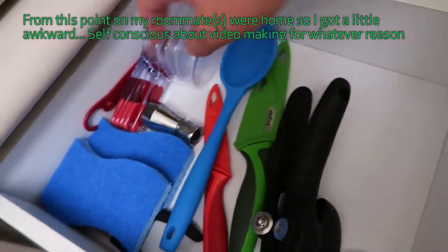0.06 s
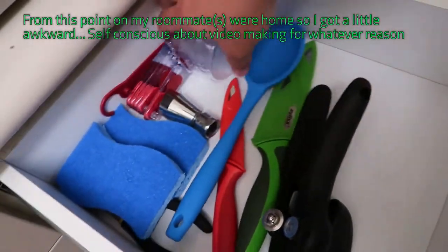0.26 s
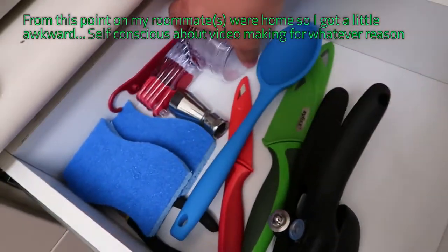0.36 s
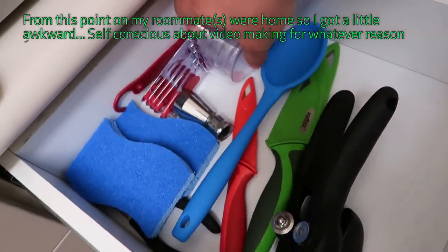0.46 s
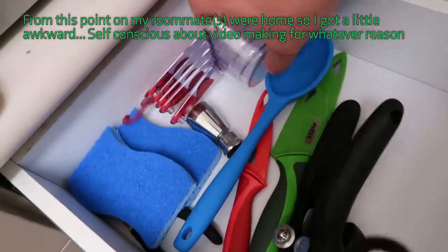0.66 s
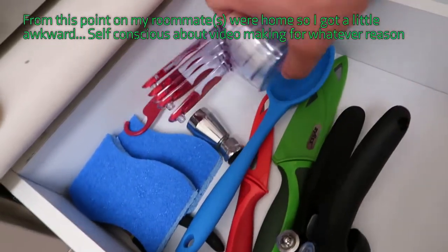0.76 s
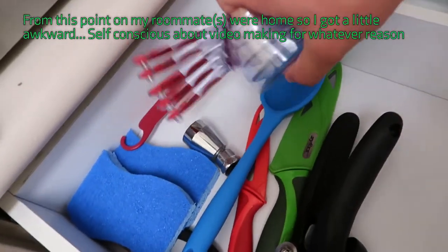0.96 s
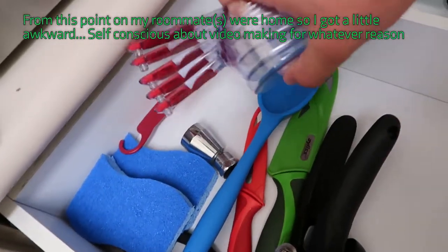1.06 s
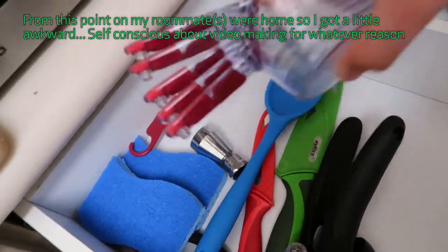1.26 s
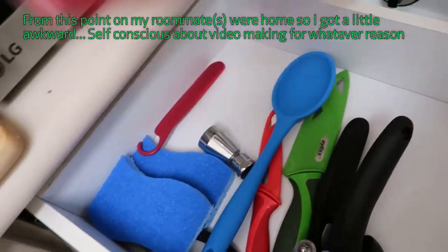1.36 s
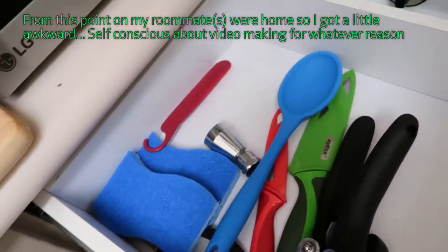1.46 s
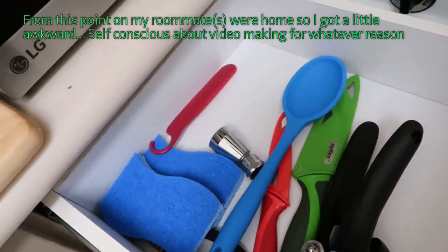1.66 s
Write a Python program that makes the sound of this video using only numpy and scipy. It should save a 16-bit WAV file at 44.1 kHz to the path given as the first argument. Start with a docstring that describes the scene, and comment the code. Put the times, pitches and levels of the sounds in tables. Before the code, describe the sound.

Plastic moulds clatter against utensils in a kitchen drawer, heard close by. From about 0.2 to 0.8 seconds come quick clacks, scraping and hollow knocks, with the hardest bump near 0.5 and a brief friction groan around 0.7. A sharp snap comes just before 1 second, then light plastic clicks thin out by 1.6. A faint appliance hum and soft rumble lie underneath in the small kitchen.

```python
"""A low appliance hum and a soft rumble come first, as a hand rummages in a kitchen drawer, close by.
A stack of plastic moulds drags and bumps on the panels, exciting their damped modes, and clacks
against the utensils. It chatters up a panel by stick-slip friction and snaps free of a spoon; once
lifted, its loose pieces click together. The drawer and a small kitchen reflect each blow."""
import sys
import numpy as np
from scipy import signal
from scipy.fft import rfft, irfft
from scipy.io import wavfile
from scipy.ndimage import uniform_filter1d

SR = 44100
rng = np.random.default_rng(int(sys.argv[2]) if len(sys.argv) > 2 else 0)


def to_wav(s):
    """Save 16-bit WAV."""
    ch = np.atleast_2d(s).T  # columns
    pcm = np.round(np.clip(ch, -1, 1) * 32767)  # PCM
    wavfile.write(sys.argv[1], SR, pcm.astype(np.int16))


N = 74970
TIME, HZ = np.arange(N) / SR, np.fft.rfftfreq(N, 1 / SR)
RING_TIME = TIME[:16384]

# Normal modes of the drawer: (frequency [Hz], level [dB], t60 [s])
DRAWER_MODES = [(170, -8, .15), (250, -7, .09), (321, -1, .11), (413, -1, .14), (484, -5, .13),
                (546, 0, .16), (640, -7, .12), (706, -3, .13), (796, -4, .13), (880, -1, .12),
                (985, -9, .13), (1078, -5, .17), (1190, -8, .16), (1265, -9, .14)]
# Spectra of contacts inside and above the drawer: (frequency [Hz], level [dB])
CLACK_SPECTRUM = [(200, -25.5), (600, -8.5), (950, -1), (1800, -0.5), (3100, -6), (4200, -5.5),
                  (5500, -4.5), (8000, -12), (12000, -20), (15500, -27.5)]
CLICK_SPECTRUM = [(200, -25), (500, -14.5), (800, -3.5), (1150, 4), (1800, 0.5), (2500, 3), (4200, -4),
                  (6000, -10), (9000, -13), (13000, -17), (15500, -32.5)]


def amp(db):
    """Decibels to amplitude ratio."""
    return 10 ** (np.asarray(db) / 20)


def unit(x):
    """Normalisation to rms 1."""
    return x / np.sqrt(np.mean(x ** 2) + 1e-20)


def read(points, hz):
    """Interpolation on a log-frequency axis."""
    f, value = np.transpose(points)
    return np.interp(np.log(hz + 1), np.log(f + 1), value)


def level(points):
    """Amplitude envelope from (time [s], level [dB]) points."""
    return amp(np.interp(TIME, *np.transpose(points)))


def add(mix, s, sound):
    """Superposition: a sound joins the mix at time s."""
    part = mix[max(round(s * SR), 0):][:len(sound)]
    part += sound[:len(part)]


def colour(x, points, size=2048):
    """Minimum-phase filter from (frequency [Hz], gain [dB]) points."""
    log_gain = np.log(amp(read(points, abs(np.fft.fftfreq(size, 1 / SR)))))
    taps = np.fft.ifft(np.exp(np.conj(signal.hilbert(log_gain)))).real[:size // 2]
    return signal.fftconvolve(x, taps)[:len(x)]


def ring(modes, length=1, detune=0., scatter=0.):
    """Free vibration as damped sines; the place of the blow shifts their pitch and phase a little."""
    hz, db, t60 = np.transpose(modes)[:, :, None]
    shift, phase = rng.uniform(-1.05, 1, (2, len(modes), 1))
    decay = amp(db - 60 * RING_TIME / (t60 * length))
    cycles = hz * (1 + detune * shift) * RING_TIME + scatter * phase
    return (decay * np.sin(2 * np.pi * cycles)).sum(0)


def room_tone():
    """Ambient sound: an appliance's line spectrum over the continuous spectrum of room air."""
    # Hum partials, air spectrum and its stereo difference: (frequency [Hz], level [dB])
    partials = [(59, -63), (119, -65.5), (236.5, -50.5), (296, -58.5), (415, -63), (532, -64.5)]
    air_spectrum = [(15, -41), (25, -29), (115, -10.5), (150, -30), (237, -10), (264, -8.5), (543, -17.5),
                    (588, -24), (927, -19.5), (13500, -45.5), (15000, -89)]
    air_width = [(25, -9), (100, -15.5), (300, -19.5), (1000, -12), (4000, -1.5), (9000, 6)]
    # Envelope of hum and air: (time [s], level [dB])
    swell = [(0, 6), (.25, 8), (.85, -3), (1.15, -11), (1.3, -2.5), (1.5, -1.5), (1.7, 0)]
    tilt = [(60, -1.5), (700, 4), (3000, 0), (9000, -8.5)]
    air, side = (amp(-51) * unit(colour(colour(noise, air_spectrum), tilt))
                 for noise in rng.standard_normal((2, N)))
    hum = sum(amp(db) * np.sqrt(2) * np.sin(2 * np.pi * (hz * TIME + rng.random()))
              for hz, db in partials)
    return level(swell) * (air + hum) + np.array([[1], [-1]]) * colour(side, air_width)


def handling_rumble():
    """Random vibration from handling, heard as low-frequency noise."""
    # Envelope: (time [s], level [dB])
    swell = [(0, -52), (.11, -40), (.21, -48), (.29, -32), (.35, -49), (.5, -56), (.54, -31.5),
             (.63, -52.5), (.72, -67), (.775, -35), (.85, -55.5), (1.3, -60.5), (1.7, -56.5)]
    # Spectrum: (frequency [Hz], level [dB])
    spectrum = [(20, -19), (60, -0.5), (110, -2.5), (200, -1), (400, -7), (1000, -55.5)]
    return level(swell) * unit(colour(rng.standard_normal(N), spectrum))


def drag(slips_per_s=4000):
    """Sliding friction: small irregular slips drive the drawer floor's modes and scratch."""
    # Strength of the dragging: (time [s], level [dB])
    effort = [(0, -45.5), (.1, -46.5), (.21, -44), (.3, -26.5), (.43, -22.5), (.46, -42), (.52, -34.5),
              (.6, -26.5), (.67, -35), (.7, -32.5), (.76, -17.5), (.81, -31), (.87, -47.5), (.94, -63),
              (1.7, -82)]
    # Spectrum of the scratch: (frequency [Hz], level [dB])
    scratch = [(100, -13.5), (400, -10.5), (1000, 0), (2800, -13), (6000, -28), (14000, -41)]
    slips = rng.standard_normal(N) * (rng.random(N) < slips_per_s / SR)
    wood = signal.fftconvolve(slips, ring(DRAWER_MODES, length=0.55))[:N]
    wood = colour(wood, [(200, -18), (400, 9), (600, -12), (1200, -13.5)])
    return level(effort) * (unit(wood) + amp(-8.5) * unit(colour(slips, scratch)))


def grazes(rows, graze_db, lead_s):
    """Friction noise: surfaces slide for an instant around each impact."""
    swell = sum(amp(peak_db + graze_db) * np.exp(-abs(TIME - s) / lead_s) for s, peak_db, *_ in rows)
    return swell * unit(colour(rng.standard_normal(N), CLACK_SPECTRUM))


def contacts(rows, modes, tone, crack_s, rise_s, ring_db, tick_db, spot_db, spot_t60, detune, size=512):
    """Hard impact: a brief force gives a tick, a crack, the struck spot's note and modal ringing."""
    # rows: (time [s], tick [dB], spot pitch [Hz], hollow, body, clack, snap and fizz bands [dB])
    # Centres of those five octave bands: (frequency [Hz])
    centres = [720, 1420, 2850, 5600, 11000]
    out, hz = np.zeros(N), np.fft.rfftfreq(size, 1 / SR)
    bands = [abs(np.log2((hz + 1) / centre)) < .5 for centre in centres]
    tick = colour(signal.unit_impulse(size), tone)
    for s, peak_db, spot_hz, *band_db in rows:
        crack = rng.choice([-1., 1.], len(RING_TIME)) * np.exp(-RING_TIME / crack_s)
        body = amp(ring_db) * ring(modes, detune=detune, scatter=0.43)
        spot = ring([(spot_hz, spot_db, spot_t60)])
        hit = colour((crack + body + spot) * (1 - np.exp(-RING_TIME / rise_s)), tone)
        power = 2 * abs(rfft(hit[:size]) / size) ** 2
        band_gains = [(f, db - 10 * np.log10(power[band].sum()))
                      for f, db, band in zip(centres, band_db, bands)]
        add(out, s, colour(hit, band_gains))
        add(out, s + rise_s, amp(peak_db + tick_db) * tick / abs(tick).max())
    return out


def utensil_clacks():
    """Impact excitation: the stack strikes the utensils and sets their modes ringing."""
    # Impacts: (time [s], tick [dB], spot pitch [Hz], five band levels [dB])
    hits = [(0.2239, -37, 2460, -32.5, -44, -49, -51, -61), (0.2684, -4.5, 1940, -29, -43, -30, -46, -46),
            (0.275, -12, 2710, -31, -40, -12.5, -23, -31), (0.2763, 0, 1750, -15, -16.5, -29, -23, -36.5),
            (0.2882, -16, 1844, -25, -17.5, -22.5, -39.5, -47),
            (0.3166, -20, 3030, -26, -22.5, -32, -33, -42.5),
            (0.3252, -20, 2480, -29, -29.5, -24, -42, -52), (0.3583, -2, 2780, -18, -30, -25.5, -44, -50),
            (0.3781, -17, 1910, -23, -27, -37, -37.5, -44.5),
            (0.3952, -23, 2445, -12, -23, -13.5, -35, -46), (0.4059, 6, 2830, -17.5, -31, -15.5, -43, -43),
            (0.472, -30, 3000, -33.5, -51, -25, -49, -60), (0.4766, -12, 3160, -27.5, -33, -37, -47, -54),
            (0.4957, -3, 2810, -25, -28.5, -13.5, -61, -55.5),
            (0.4999, -24, 2576, -20, -23, -17.5, -36, -40.5),
            (0.532, -7, 1713, -13, -19, -34.5, -36.5, -47), (0.5617, -16, 2270, -17.5, -22, -31, -28, -49),
            (0.6294, -14, 2707, -35, -29.5, -31, -49.5, -52), (0.728, -16, 2490, -51, -32, -28.5, -40, -48),
            (0.7435, 0, 1740, -17.5, -47, -21.5, -31, -35),
            (0.7711, -1, 1917, -19.5, -15.5, -23.5, -37.5, -57.5),
            (0.7808, -24, 1930, -21.5, -25.5, -30, -43.5, -58),
            (0.8674, -42, 2060, -32, -60, -41.5, -45.5, -58.5)]
    # Utensil modes: (frequency [Hz], level [dB], t60 [s])
    modes = [(864, -9, 0.48), (1194, 1, 0.11), (1295, 0.5, 0.061), (1747, 0.5, .13), (2200, -12, .1),
             (2600, -6, 0.023), (2960, 4, 0.026), (3040, 1, 0.036), (3266, -1, 0.1), (3790, 2, 0.074),
             (4380, -3, 0.22), (5290, -4, .1), (5600, -11, 0.19), (6670, -5.5, .1)]
    clacks = contacts(hits, modes, CLACK_SPECTRUM, crack_s=0.0055, rise_s=0.00051, ring_db=-22,
                      tick_db=-14, spot_db=-10, spot_t60=.045, detune=0.0065)
    return amp(-4) * clacks + grazes(hits, graze_db=-34.5, lead_s=0.0045)


def knocks(thud_s=0.0023):
    """Resonance: each bump thuds and excites the drawer modes near the centre of its spectrum."""
    # Bumps: (time [s], ring [dB], thud [dB], centre [Hz], spread [octaves], ring length [ratio])
    bumps = [(.2255, -6, -42, 315, 0.13, 0.97), (0.2773, -11.5, -12.5, 420, 1, 1.12),
             (.323, -29, -12.5, 880, 0.43, 0.81), (0.356, -13, -11.5, 415, 0.87, 0.51),
             (.371, -23, -15, 315, 0.32, 1.7), (0.378, -7.5, -22, 334, 0.17, 0.27),
             (.3955, -11.5, -19, 810, 0.31, 0.89), (.407, -12, -20.5, 900, 0.2, 1.16),
             (.423, -25, -28, 710, 0.77, 1.8), (0.477, -19.5, -30, 368, 0.43, 0.59),
             (.496, -37, -17, 357, .9, 0.54), (.5335, -7.5, 0.5, 537, 0.43, 1.14),
             (.564, -29.5, -15, 620, 0.47, 1), (0.628, -42, -37, 403, 0.28, 0.57),
             (0.6521, -13.5, -15, 457, 1.25, 0.67), (0.73, -37, -14, 351, .6, .8),
             (0.744, -20, -30, 347, 0.43, 0.76), (.758, -17.5, -9.5, 396, 0.33, 0.74),
             (0.7706, -3.5, -0.5, 516, 0.98, 0.9), (0.784, -26, -10.5, 455, 0.4, 0.33),
             (1.1, -38, -60, 165.6, 0.17, 1.4), (1.5557, -39.5, -41.5, 670, 1, 0.85),
             (1.609, -31, -33, 800, 0.22, 0.62)]
    out, t = np.zeros(N), RING_TIME
    pulse = t / thud_s * np.exp((1 - (t / thud_s) ** 2) / 2)
    for s, ring_db, thud_db, hz, spread, length in bumps:
        modes = np.array(DRAWER_MODES, float)
        modes[:, 1] -= 20 * np.log10(1 + (np.log2(modes[:, 0] / hz) / spread) ** 4)
        wood = ring(modes, length, detune=0.0082, scatter=0.17) * (1 - np.exp(-t / 0.0016))
        add(out, s, amp(ring_db) * wood / np.linalg.norm(amp(modes[:, 1])))
        add(out, s, amp(thud_db) * pulse * np.sin(2 * np.pi * hz * 0.904 * t))
    return out


def pings():
    """Free decay: a struck metal utensil rings on in thin, high modes."""
    # Strikes: (time [s], level [dB])
    strikes = [(0.275, -33), (0.5652, -32)]
    # Metal modes: (frequency [Hz], level [dB], t60 [s])
    modes = [(4300, -12, 0.21), (4810, -0.5, 0.089), (4700, 3, 0.086), (5060, -6.5, 0.11), (6620, -14, .1),
             (8650, -24, 0.12)]
    out = np.zeros(N)
    for s, db in strikes:
        add(out, s, amp(db) * ring(modes, detune=0.0033, scatter=.5))
    return out


def thump(s=.536, width_s=0.0036):
    """Low-frequency transient: one short, deep thump is heard at the hardest bump."""
    pulse = np.exp(-((TIME - s) / width_s) ** 2)
    return amp(-19.5) * colour(pulse, [(5, -14), (25, -1), (100, -2), (400, -3)])


def chatter(jitter=0.11):
    """Stick-slip oscillation: the stack groans unevenly as it is pulled up the panel."""
    # Course of the groan: (time [s], pitch [Hz], level [dB])
    groan = [(.67, 396.6, -57.5), (0.686, 404, -20), (.703, 417, -28), (0.721, 389.6, -20.5),
             (.745, 353, -23.5), (.76, 340, -41)]
    s, hz, db = np.transpose(groan)
    wobble = unit(uniform_filter1d(rng.standard_normal(N), size=120))
    pitch = np.interp(TIME, s, hz) * (1 + jitter * wobble)
    phase = 2 * np.pi * np.cumsum(pitch) / SR
    envelope = amp(np.interp(TIME, s, db)) * (TIME > s[0]) * (TIME < s[-1])
    return envelope * (np.sin(phase) + amp(-6.5) * np.sin(2 * phase))


def spoon_snap():
    """Transient excitation: the stack snaps free of the spoon, which rings briefly."""
    # Release: (time [s], tick [dB], spot pitch [Hz], five band levels [dB])
    hits = [(0.9451, -0.51, 4057, -27.5, -16, -16.5, -18, -29)]
    # Spoon modes: (frequency [Hz], level [dB], t60 [s])
    modes = [(1100, -6, .13), (1270, -1, .15), (1350, 0, .13), (1723, -4, .12), (2094, 2, .12),
             (2755, -1, .11), (3085, -4, .11), (3880, -3, .11), (4115, -1, .11), (4440, -10, .1),
             (6050, -9, .09), (7400, -10, .08)]
    snap = contacts(hits, modes, CLICK_SPECTRUM, crack_s=0.0017, rise_s=.0008, ring_db=-31,
                    tick_db=2, spot_db=-9, spot_t60=0.016, detune=0.0014)
    return amp(-3) * snap + grazes(hits, graze_db=-26.5, lead_s=0.0027)


def stack_clicks():
    """Rattling: loose pieces of the lifted stack collide and excite its modes."""
    # Collisions: (time [s], tick [dB], spot pitch [Hz], five band levels [dB])
    hits = [(1.035, -4.5, 2314, -19.5, -22, -18.5, -21.5, -32.5),
            (1.0494, -27, 2100, -18, -27.5, -17.5, -31, -36),
            (1.0908, -26, 4045, -46, -25.5, -32, -24.5, -36), (1.0982, -24, 2600, -54, -33, -26, -33, -66),
            (1.2351, -19.5, 1680, -37, -32, -54, -46, -53), (1.2481, -34.5, 1620, -44, -29, -33, -36, -39),
            (1.3092, -27, 3290, -36, -45, -41, -40, -54),
            (1.3331, -26, 1656, -49.5, -34, -39.5, -41.5, -51.5),
            (1.4803, -46, 2690, -56, -61, -57, -87, -94), (1.6013, -37, 1405, -40.5, -42, -46, -66, -70)]
    # Stack modes: (frequency [Hz], level [dB], t60 [s])
    modes = [(764, -3, .12), (888, 0, .13), (1045, -1, .15), (1170, -3, .16), (1490, -5, .13),
             (2092, -4, .14), (2325, 1, .13), (2520, -4, .11), (3380, -5, .1), (4080, -4, .09),
             (4560, -8, .09), (4970, -7, .08)]
    clicks = contacts(hits, modes, CLICK_SPECTRUM, crack_s=0.0053, rise_s=0.00066, ring_db=-25,
                      tick_db=-15.5, spot_db=-15, spot_t60=0.06, detune=0.0035)
    return amp(-4.5) * clicks + grazes(hits, graze_db=-26.5, lead_s=0.0027)


def echoes(x, t60, onset_s):
    """Reverberation: dense reflections, each band dying at its own rate, wider in the treble."""
    # Stereo difference of the echoes: (frequency [Hz], level [dB])
    width = [(100, -41), (500, -20.5), (1000, -23), (2200, -13.5), (4500, -5), (9000, 3)]
    hz, t, noise = signal.stft(rng.choice([-1., 1.], (2, SR // 2)), SR, nperseg=256)
    decay = amp(-60 * t / read(t60, hz)[:, None])
    mid, side = signal.istft(noise * decay, SR, nperseg=256)[1]
    side = colour(side, width)
    build_up = 1 - np.exp(-(TIME[:len(mid)] / onset_s) ** 2)
    tail = np.array([mid + side, mid - side]) * build_up
    return signal.fftconvolve(x[None], tail / np.linalg.norm(tail[0]), axes=1)[:, :N]


def stereo_pair(x, right_lag_s=18e-6, size=96):
    """Decorrelation: two close receivers are alike in the bass, scattered apart in the treble."""
    # Stereo difference of the direct sound: (frequency [Hz], level [dB])
    width = [(60, -31), (250, -41), (500, -24), (1000, -23.5), (2000, -17.5), (4000, -17.5), (8000, -7.5),
             (14000, -2.5)]
    scatter = irfft(np.exp(2j * np.pi * rng.random(size // 2 + 1)))
    side = colour(signal.fftconvolve(x, scatter)[:N], width)
    right = irfft(rfft(x) * np.exp(-2j * np.pi * HZ * right_lag_s), N)
    return np.array([x + side, right - side])


def scene():
    """Superposition of direct sound, the drawer's and kitchen's reflections, and the background."""
    # Panel radiation, weak in the deep bass: (frequency [Hz], gain [dB])
    radiation = [(25, -25), (70, -5), (150, -0.5), (4000, 0.5)]
    # Reverberation times of drawer and kitchen: (frequency [Hz], t60 [s])
    drawer_t60 = [(200, 0.11), (1000, 0.12), (4000, 0.042), (14000, 0.057)]
    kitchen_t60 = [(150, 0.12), (500, 0.43), (1200, 0.37), (3000, 0.31), (7000, .3), (14000, 0.18)]
    wood = colour(amp(-0.5) * knocks() + drag() + chatter(), radiation)
    inside = utensil_clacks() + pings()
    above = spoon_snap() + stack_clicks()
    drawer = echoes(amp(-12) * wood + amp(-8.5) * inside + amp(-2.5) * above, drawer_t60, 0.0019)
    kitchen = echoes(amp(-19) * wood + amp(-10) * inside + amp(-8) * above, kitchen_t60, 0.0076)
    direct = stereo_pair(wood + inside + above)
    return direct + drawer + kitchen + thump() + room_tone() + handling_rumble()


def record(dry, edge_hz=15800):
    """Hard clipping of peaks beyond full scale, then band limiting."""
    low_pass = signal.firwin(255, edge_hz, window=("kaiser", 9), fs=SR)
    return signal.oaconvolve(np.clip(dry, -1, 1), low_pass[None], "same")


dry = scene()
out = record(dry)
to_wav(out)
```